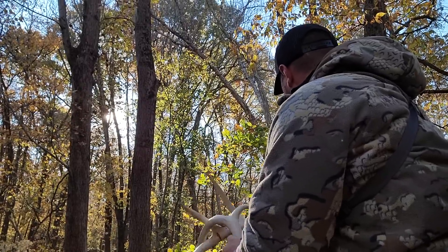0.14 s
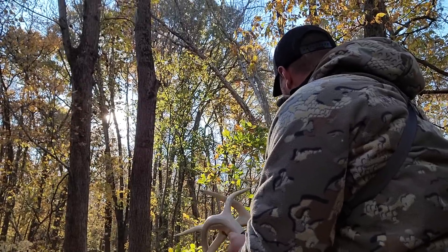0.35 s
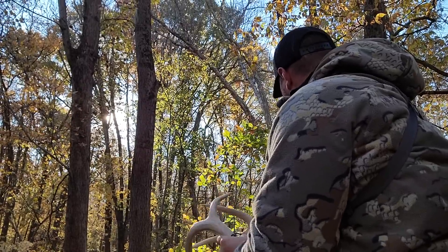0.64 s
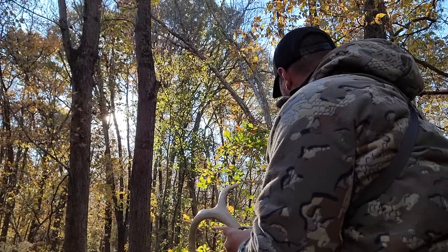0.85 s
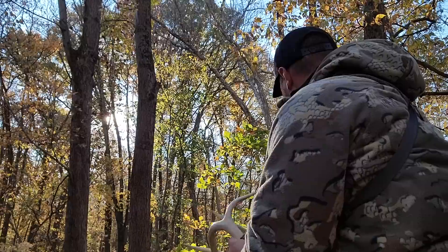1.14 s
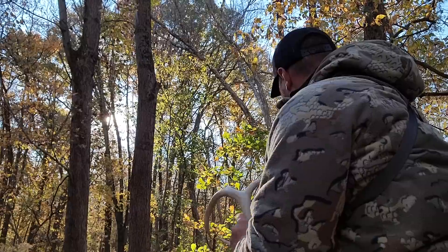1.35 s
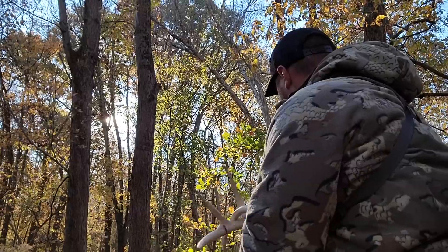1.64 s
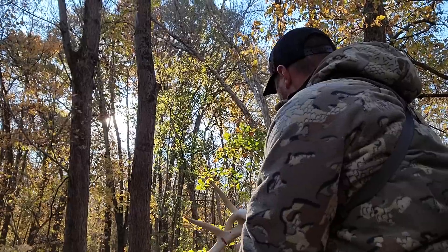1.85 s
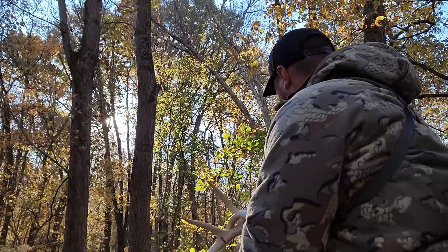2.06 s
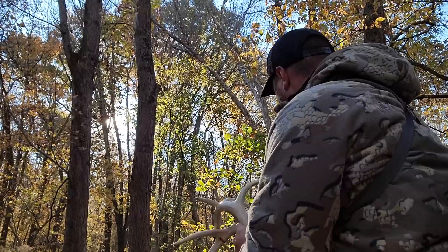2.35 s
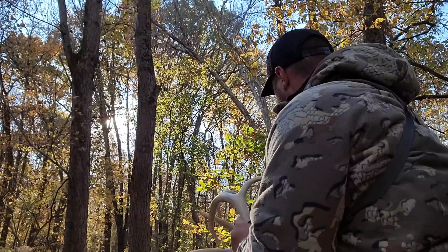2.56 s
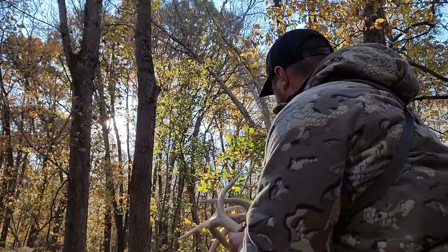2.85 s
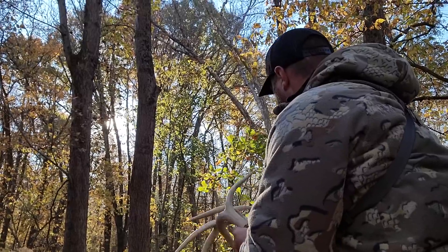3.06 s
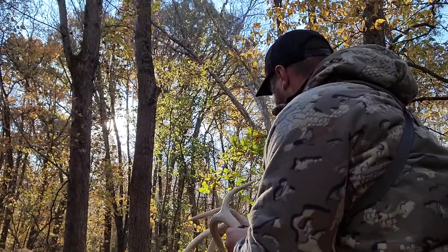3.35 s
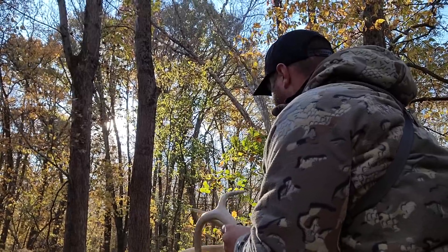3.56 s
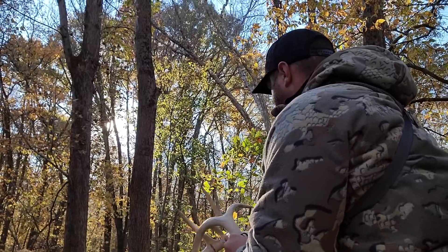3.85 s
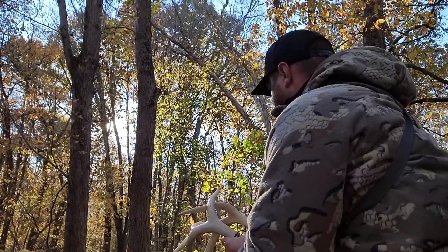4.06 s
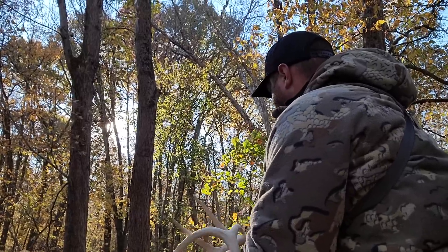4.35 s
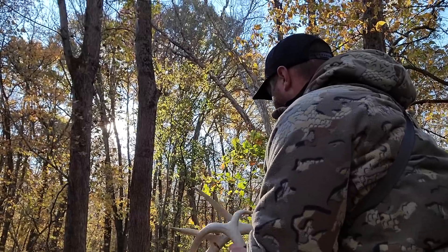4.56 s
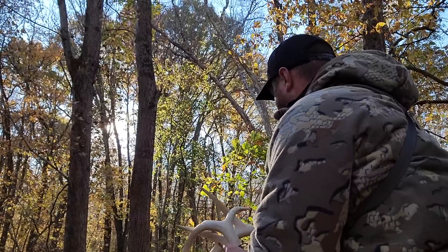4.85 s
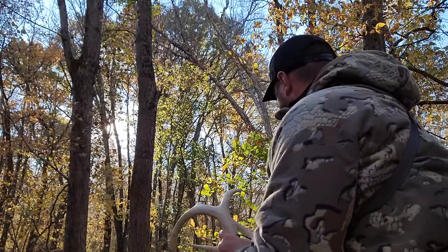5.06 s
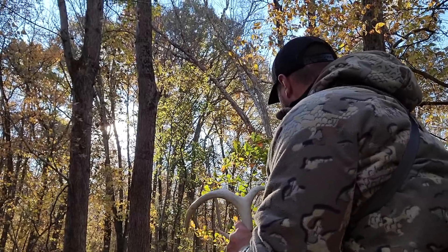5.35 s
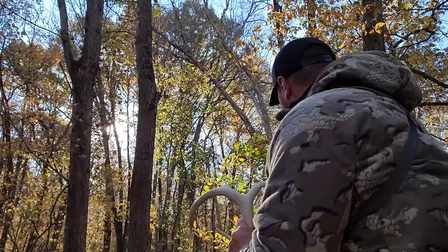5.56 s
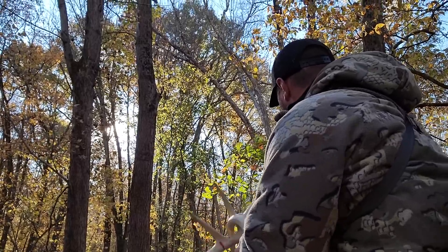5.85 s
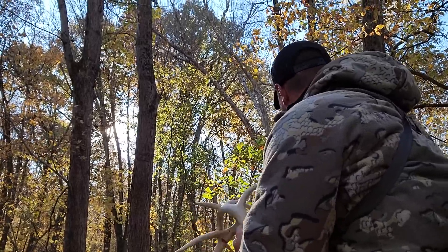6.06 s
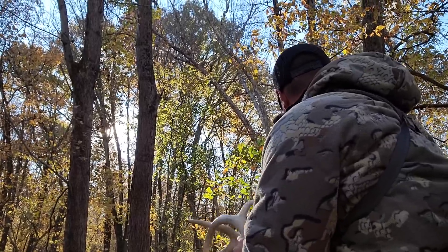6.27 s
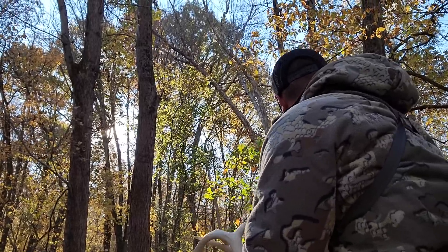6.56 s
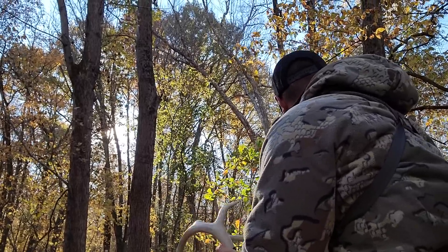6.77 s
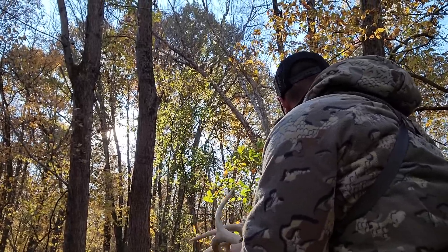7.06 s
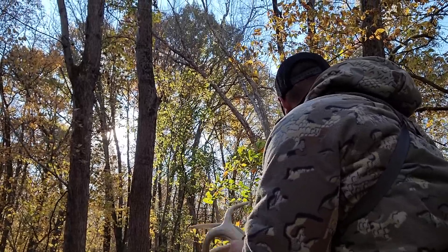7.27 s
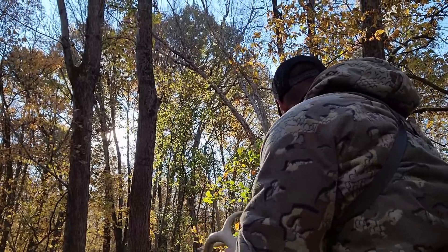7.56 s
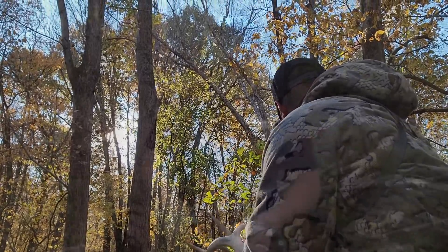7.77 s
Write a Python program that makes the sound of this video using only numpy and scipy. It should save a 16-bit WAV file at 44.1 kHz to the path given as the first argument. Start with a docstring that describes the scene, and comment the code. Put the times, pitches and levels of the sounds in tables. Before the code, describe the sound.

Two deer antlers clack and rattle together in sharp, dry, irregular bursts, close by in quiet woods with faint leaf rustle and low wind.

```python
"""Antlers clacked in a quiet wood

Two deer antlers are clacked and ground together by hand, a few steps from a pair of microphones and nearer the left.
Each contact is a short skid of tiny impacts that rings damped bone modes; decaying noise makes the wood's soft tail.
Dense weak slips make the softer rubbing; banded stereo noise gives a faint rustle of leaves and a low wind rumble."""
import sys
import numpy as np
from scipy import signal
from scipy.fft import rfft, irfft
from scipy.io import wavfile
from scipy.ndimage import uniform_filter1d

SR = 44100
rng = np.random.default_rng(int(sys.argv[2]) if len(sys.argv) > 2 else 0)


def wrap_up_sound(samples):
    """Save the sound to the file named by the first command line argument, as 16-bit audio."""
    columns = np.atleast_2d(samples).T
    # keep every value between -1 and 1, then stretch to whole-number steps
    tamed = np.clip(columns, -1, 1)
    steps = np.round(tamed * 32767).astype(np.int16)
    wavfile.write(sys.argv[1], SR, steps)


def magnitude_from_level(level_db):
    """Linear magnitude for a level in decibels (20 dB per decade)."""
    exponent = np.asarray(level_db, float) / 20
    return 10 ** exponent


N = 348478

# air of the wood, shape of its spectrum: [f/Hz, relative level/dB per Hz]
AIR_SPECTRUM = [(12, -30), (20, 3), (71, -3), (381, -20), (426, -19), (1420, -24), (1880, -25), (2490, -24),
                (15000, -47.5), (16400, -52)]
# correlation of the air between left and right: [f/Hz, likeness/1]
AIR_LIKENESS = [(60, 0.4), (200, 0.1), (500, 0.4), (1200, 0.03)]
# antler contacts, relative levels: [t/s, tine level/dB, beam level/dB, tick level/dB, held base knock level/dB]
CONTACTS = [(0.001, -27.0, -23, -39, -37.5), (0.0254, -34, -36, -63, -45), (0.034, -41, -40, -70, -49),
            (0.0446, -39.5, -33, -63.0, -39), (0.1011, -49.5, -43, -65.0, -57.0),
            (0.1082, -48.0, -43.5, -71.0, -60.0), (0.1529, -17, -26, -38.0, -36),
            (0.1679, -30.5, -23.0, -41.0, -45), (0.177, -28.0, -28.5, -42.0, -46),
            (0.1827, -34, -23.5, -53, -43.5), (0.1918, -35, -37.5, -65, -60), (1.011, -20, -30, -31, -48.5),
            (1.0318, -37, -36.5, -39, -49), (1.0362, -28, -40.5, -48, -59),
            (1.056, -18, -25.5, -21.5, -41.5), (1.0743, -33, -36.0, -51, -59),
            (1.1344, -43, -34.5, -56.0, -65), (1.4093, -17, -24.5, -20, -45),
            (1.4484, -16.5, -27.5, -25, -44.0), (1.4754, -15, -17, -36, -36.5),
            (1.4841, -32.5, -34, -44.5, -42), (1.4939, -29, -31.5, -45.5, -30.5),
            (1.5016, -13.5, -12.5, -33, -27), (1.5459, -40, -30.5, -57, -34.5),
            (1.5892, -46, -36, -65.5, -44.5), (1.7154, -40.5, -33.5, -70, -48),
            (2.1469, -18.5, -20.5, -38.5, -32.5), (2.4557, -50, -43.5, -67.5, -60),
            (2.7604, -23, -29, -31.5, -49), (2.8051, -11, -14, -20, -33),
            (2.8225, -27.5, -17, -38.0, -42.0), (2.8327, -19.5, -27.5, -33.5, -35),
            (2.8435, -25.5, -21, -45.0, -34.5), (2.914, -52, -36.5, -65.0, -56),
            (2.9181, -51, -36.5, -67, -43), (2.9413, -51, -40.0, -77, -48),
            (2.9539, -58, -35.5, -69, -57.0), (2.9589, -51, -53, -76, -57.0),
            (3.0434, -34, -29.5, -50, -38), (3.0551, -18, -14, -36, -33.0),
            (3.0641, -12.5, -18.5, -28.5, -30.0), (3.0762, -22.5, -21.5, -36.5, -40.5),
            (3.2636, -43, -33.5, -66, -55.0), (3.29, -37.5, -35.5, -76, -51), (3.326, -47, -41.5, -77, -67),
            (3.3452, -37.5, -30, -74, -54.5), (3.3546, -50.5, -45, -75, -57), (3.42, -21, -21, -39.0, -47),
            (3.5217, -46, -51, -62, -66), (3.5314, -40, -41.5, -59.0, -61.0),
            (3.632, -22.5, -32.5, -36.5, -55.5), (3.6409, -12.5, -19, -17, -42),
            (3.651, -20.0, -22, -36.5, -45.0), (3.7029, -38.5, -32, -54.5, -57),
            (3.9373, -16, -19, -32.5, -55), (3.9539, -12.5, -33.5, -36, -54),
            (3.9615, -20.5, -19.5, -31.5, -38.5), (4.0241, -40.5, -41.5, -60.5, -59),
            (4.3314, -19, -34.5, -36.5, -49), (4.3718, -30.5, -31.0, -41.5, -48),
            (4.3971, -43.5, -35, -55, -48), (4.867, -57, -54, -77.5, -66),
            (5.7219, -17, -19.5, -18.5, -43.5), (5.7445, -27, -28, -26.5, -38),
            (5.7695, -17.0, -17.5, -28.0, -35.5), (5.7849, -25, -22, -38, -37),
            (5.7968, -14, -14.5, -24.5, -29.5), (5.8538, -35, -33.5, -52, -34.5),
            (5.8848, -41, -33, -61, -43.5), (5.8944, -48, -42.5, -59, -42),
            (5.9896, -26.5, -32.5, -48, -43), (6.0048, -33, -27.5, -58.0, -56.5),
            (6.0166, -43, -40.5, -65, -42), (6.2911, -17.5, -21.5, -34, -43),
            (6.3137, -25, -25, -38, -36.5), (6.3245, -17.5, -21.5, -32.5, -58),
            (6.3335, -20.0, -33, -50, -46), (6.3407, -34, -33.5, -47, -43),
            (6.9297, -22.5, -28.5, -34, -40), (6.9387, -10, -12, -22, -30.5),
            (6.9776, -18.5, -21, -26, -52), (6.9921, -28, -24.5, -33, -50),
            (7.008, -20.5, -17.5, -42, -42.0), (7.0153, -29.5, -35.5, -48, -52),
            (7.0418, -35.5, -25, -56, -50.0), (7.102, -41.5, -25, -64.5, -44.0),
            (7.1126, -45, -34.5, -72, -49.5), (7.143, -41, -32, -69, -55.5),
            (7.2095, -42.5, -33.5, -70.5, -64), (7.2466, -16, -32.5, -33.0, -47),
            (7.262, -32, -27.5, -36.0, -49.5), (7.4174, -26.0, -29.5, -37, -50.0),
            (7.5282, -23.5, -36.5, -37, -50), (7.545, -17, -17, -23.5, -39),
            (7.5647, -22.5, -36.5, -39.5, -43.5), (7.7873, -23, -33, -37, -57),
            (7.8093, -25.5, -28.5, -43, -60), (7.822, -32, -44, -61.0, -61)]
# bone modes by the part that rings, each a 60 dB decay time t60/s, then modes: [f/Hz, relative level/dB]
TINE_MODES = 0.016, [(2450, -2), (2800, -0.5), (2960, -7.5), (3140, -2), (3400, -3.5), (3750, -9.5),
              (4200, -8), (4500, -0.5)]
BEAM_MODES = 0.037, [(1100, -8), (1440, -1), (1700, -2.5), (1830, -3), (2100, -5)]
TICK_MODES = 0.0097, [(5330, 1.5), (6030, -3), (6800, -0.5), (7400, -1), (8600, -7.5), (10100, -21.5),
              (12200, -8.5), (14500, -16.5)]
BASE_MODES = 0.09, [(270, -18), (385, 5.5), (525, 9.5), (870, 13.5)]
# tines sliding softly over each other: [t/s, relative level/dB]
RUB_LEVEL = [(.44, -88), (.52, -63), (.64, -75.5), (4.22, -89.5), (4.26, -59.5), (4.34, -87.5),
             (6.5, -69.5), (6.69, -53), (6.8, -80)]
# microphone port resonances: [f/Hz, width/octaves, level/dB]
LEFT_PORT = [(2824, 0.85, 6.5), (4000, 1, 2), (7120, 0.9, 8)]
RIGHT_PORT = [(3925, 0.62, 15.5), (6800, 0.62, -6), (12900, 0.7, -4.5)]


def rms_one(x):
    """Scales a signal to an rms of 1."""
    return x / np.sqrt(np.mean(x ** 2) + 1e-20)


def at_hz(points, hz):
    """Reads a spectrum table between its points, along log frequency."""
    table_hz, value = np.array(points).T
    return np.interp(np.log(hz), np.log(table_hz), value)


def drift(rate_hz):
    """Slow random wandering of spread 1: noise through two equal low-pass poles."""
    hop = 40  # samples from one drawn value to the next
    pole = np.exp(-2 * np.pi * rate_hz * hop / SR)
    noise = rng.standard_normal(N // hop + 2002)
    slow = signal.lfilter([1], [1, -2 * pole, pole * pole], noise)[2000:]  # past the filter's start
    return np.interp(np.arange(N) / hop, np.arange(len(slow)), rms_one(slow))


def air():
    """Leaf rustle and wind rumble as half-octave bands of stereo noise; gusts move the low ones most."""
    out, gust = 0, drift(rate_hz=1.5)
    lows = 20 * 2 ** np.arange(0, 10, 0.5)
    highs = np.append(lows[1:], 19000)
    white = rng.standard_normal((2, 2, N))
    for k, (low, high) in enumerate(zip(lows, highs)):
        band = signal.butter(2, [low, high], "band", fs=SR, output="sos")
        mid, side = signal.sosfilt(band, white[k % 2])  # neighbouring bands use separate noise
        hz = np.sqrt(low * high)
        alike = np.clip(at_hz(AIR_LIKENESS, hz), -1, 1)
        gust_db = 0.3 + 1.5 / (1 + hz / 150)
        gain = magnitude_from_level(at_hz(AIR_SPECTRUM, hz) + gust_db * gust)
        stereo = np.sqrt(1 + alike) * mid + np.sqrt(1 - alike) * side * [[1], [-1]]
        out = out + gain * stereo
    side_db = np.array([[-1.5], [1.5]])  # the right side is louder
    return magnitude_from_level(-57.5) * rms_one(out) * magnitude_from_level(side_db)


def skids(count, per_s, fade_s):
    """The rough surfaces meet in a first impact and a dying spray of smaller ones."""
    t = np.arange(1024) / SR
    hit = rng.random((count, len(t))) < per_s / SR
    size = rng.standard_normal((count, len(t)))
    force = hit * size * 0.74 * np.exp(-t / fade_s)
    force[:, 0] = 1
    return force


def ringing(part, count, spread_db, detune):
    """One impulse response per contact; place and grip change each mode's strength, sign and pitch."""
    t60, modes = part
    hz, db = np.transpose(modes)[:, None, :, None]
    t = np.arange(4096) / SR
    strength, pitch, sign = rng.standard_normal((3, count, len(modes), 1))
    waves = np.sin(2 * np.pi * hz * (1 + detune * pitch) * t) * magnitude_from_level(-60 * t / t60)
    return np.sum(np.sign(sign) * magnitude_from_level(db + spread_db * strength) * waves, axis=1)


def clacks():
    """Every skid drives the four parts of the bone, each at its own level."""
    s, *levels = np.transpose(CONTACTS)
    starts = (s * SR).astype(int)
    force = skids(count=len(s), per_s=1700, fade_s=0.0031)
    out = np.zeros(N + 6000)  # room for the last ring
    for part, db in zip((TINE_MODES, BEAM_MODES, TICK_MODES, BASE_MODES), levels):
        bone = ringing(part, count=len(s), spread_db=3.5, detune=0.025)
        rings = signal.fftconvolve(force, bone, axes=1)
        power = uniform_filter1d(rings ** 2, size=176, axis=1)  # over 4 ms
        loudest = np.sqrt(2 * power.max(axis=1))
        rings = rings * (magnitude_from_level(db) / loudest)[:, None]
        for start, ring in zip(starts, rings):
            out[start:start + len(ring)] += ring
    return out[:N]


def woods(x):
    """Near scatter from the hands, body and ground, then a longer, duller tail from the trunks."""
    t = np.arange(SR // 2) / SR
    near = magnitude_from_level(-30.5 - 60 * t / 0.09) * rng.standard_normal((2, len(t))) * (t > 0.003)
    far = magnitude_from_level(-50.5 - 60 * t / 0.4) * rng.standard_normal((2, len(t)))
    far = far * np.minimum(t / 0.033, 1)  # builds up over 33 ms
    far = signal.sosfilt(signal.butter(2, [700, 6000], "band", fs=SR, output="sos"), far)
    return signal.fftconvolve(x[None], near + far, axes=1)[:, :N]


def rubbing():
    """Dense weak slips of the sliding tines feed the beam and tine modes."""
    hit = rng.random(N) < 900 / SR  # 900 slips per second
    slips = hit * rng.standard_normal(N) * magnitude_from_level(2.5 * drift(rate_hz=30))
    body = sum(ringing(part, count=1, spread_db=7, detune=0.01)[0] for part in (TINE_MODES, BEAM_MODES))
    level_db = np.interp(np.arange(N) / SR, *np.transpose(RUB_LEVEL))
    return magnitude_from_level(level_db) * rms_one(signal.fftconvolve(slips, body)[:N])


def scene():
    """The antlers are nearer the left microphone: louder and earlier there."""
    antlers = clacks() + rubbing()
    right_lag_s = 8e-5
    hz = np.fft.rfftfreq(N, 1 / SR)
    late = irfft(rfft(antlers) * np.exp(-2j * np.pi * hz * right_lag_s), N)
    direct = np.array([antlers * magnitude_from_level(1.16), late * magnitude_from_level(-1.06)])
    return direct + woods(antlers) + air()


def peak(x, hz, octaves, db):
    """A causal bell-shaped boost or cut, as one resonance of a microphone port."""
    w, a = 2 * np.pi * hz / SR, magnitude_from_level(db / 2)
    s = np.sin(w) * np.sinh(np.log(2) / 2 * octaves * w / np.sin(w))
    top = [1 + s * a, -2 * np.cos(w), 1 - s * a]
    bottom = [1 + s / a, -2 * np.cos(w), 1 - s / a]
    return signal.lfilter(top, bottom, x)


def low_pass(x):
    """Removes everything above the highest recorded frequency."""
    return signal.sosfilt(signal.butter(12, 16500, fs=SR, output="sos"), x)


def record(dry):
    """Each microphone port colours its channel; a soft limit rounds the peaks."""
    sides = []
    for x, port in zip(dry, (LEFT_PORT, RIGHT_PORT)):
        for hz, octaves, db in port:
            x = peak(x, hz, octaves, db)
        sides.append(x)
    mix = 1.388 * np.tanh(np.array(sides) / 1.604)
    return low_pass(mix)


dry = scene()
out = record(dry)
wrap_up_sound(out)
```